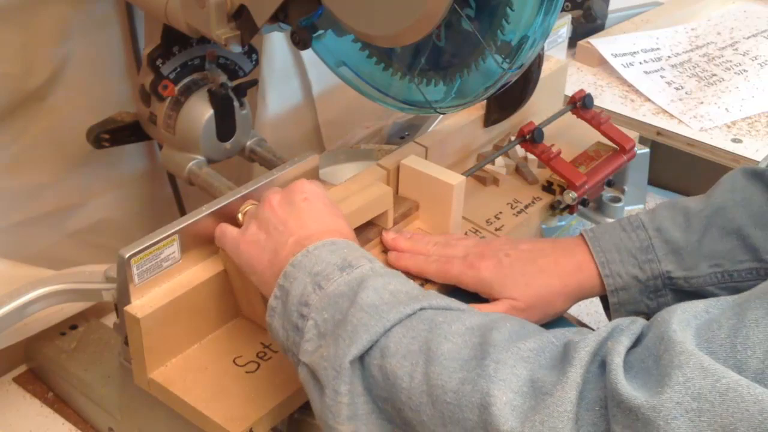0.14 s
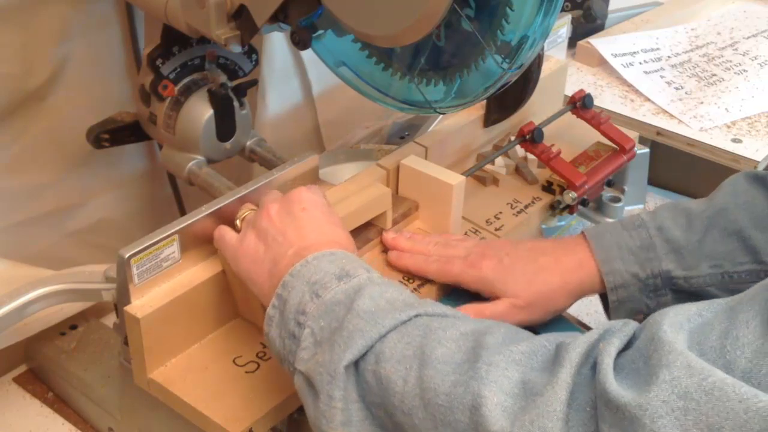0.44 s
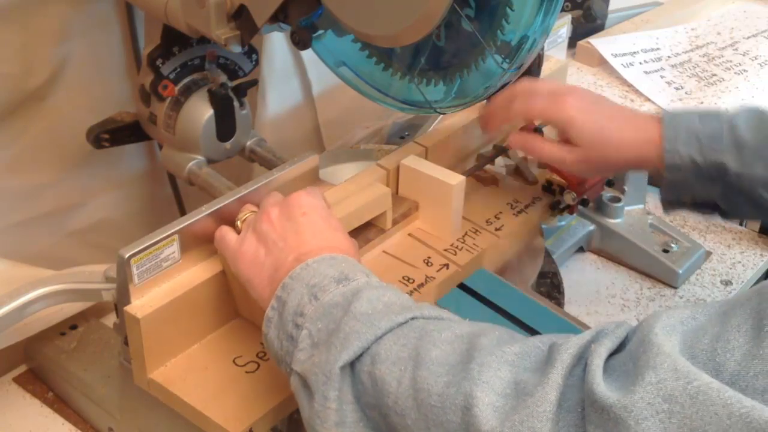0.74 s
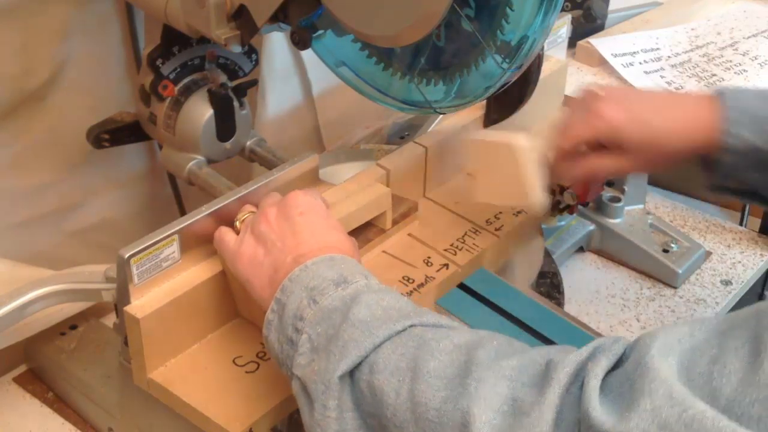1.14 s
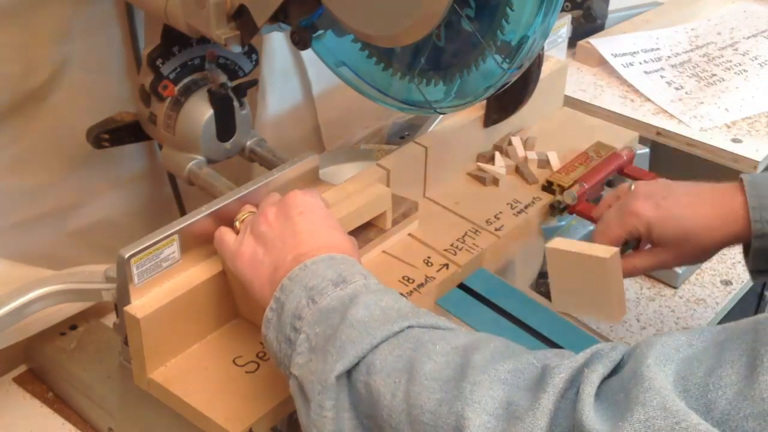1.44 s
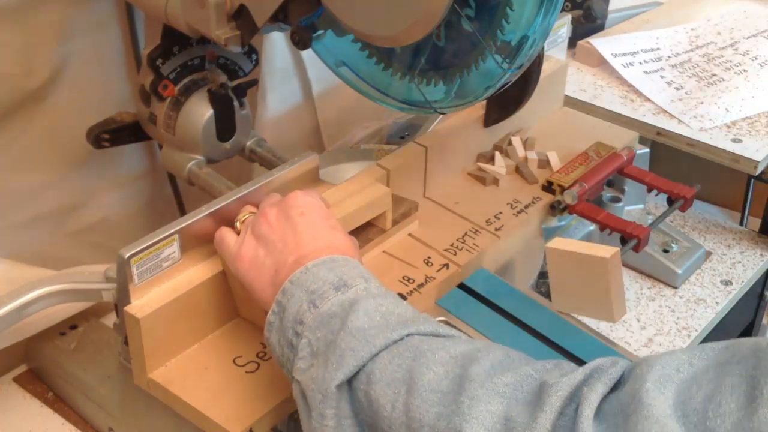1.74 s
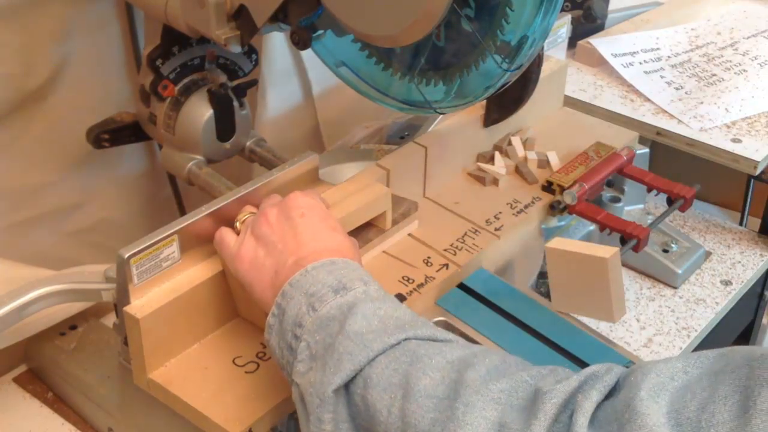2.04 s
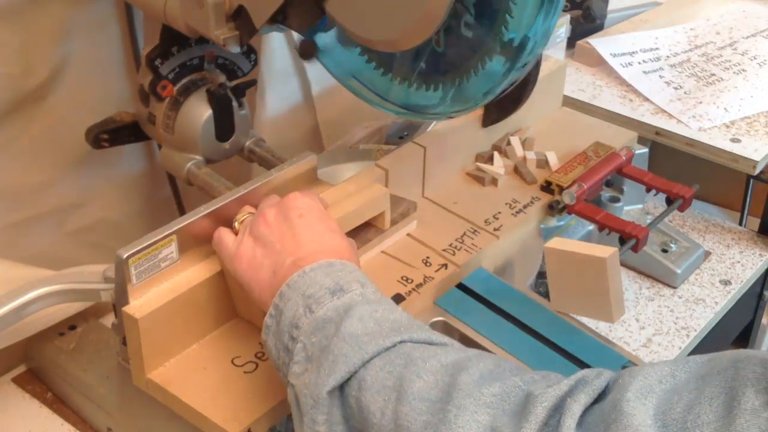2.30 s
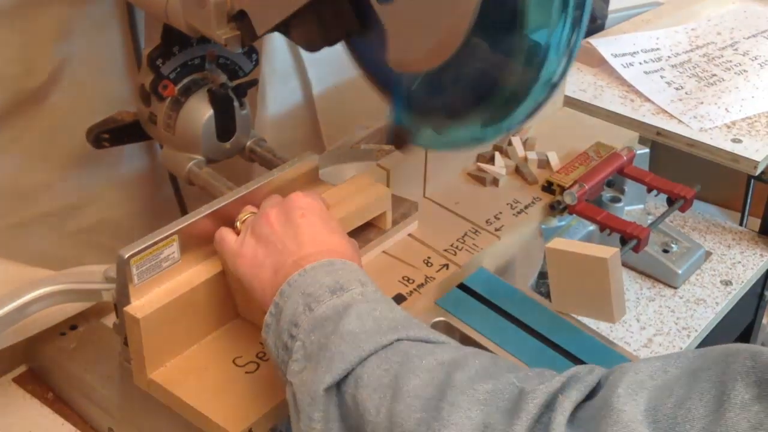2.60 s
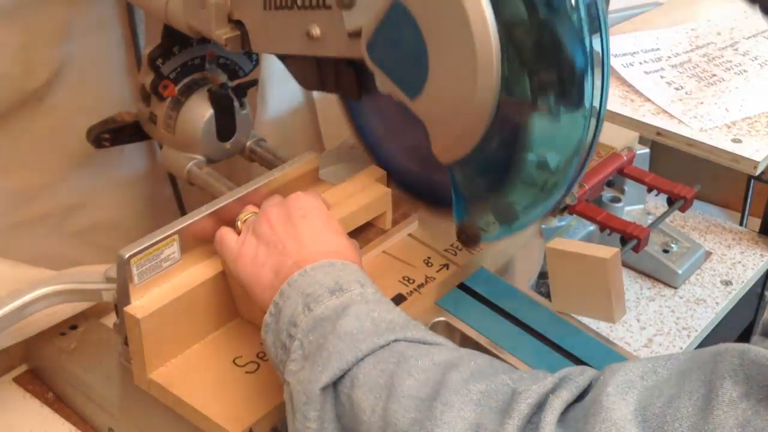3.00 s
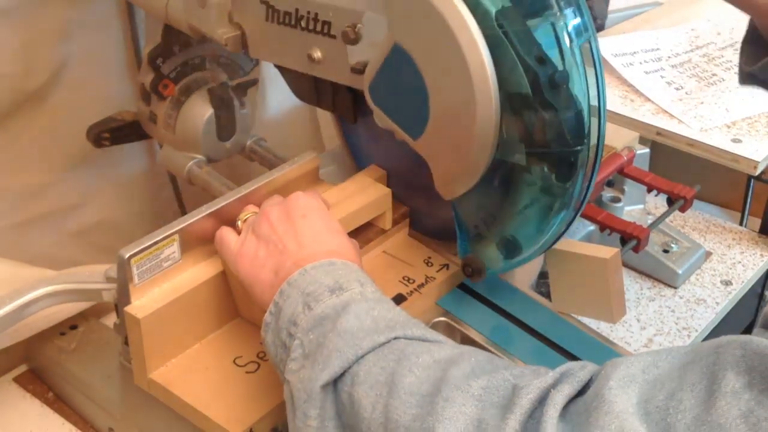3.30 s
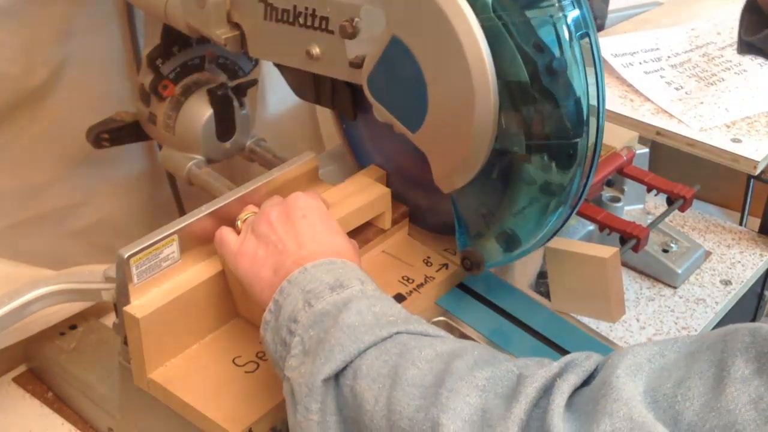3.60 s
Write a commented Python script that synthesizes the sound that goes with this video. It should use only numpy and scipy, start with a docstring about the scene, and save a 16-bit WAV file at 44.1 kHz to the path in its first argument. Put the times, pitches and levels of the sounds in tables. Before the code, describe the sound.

Electric saw heard close in a workshop; first a dying rumble and quiet taps of a wooden block, then a click, soft buzz, rapid spin-up to a harsh roar, and a late sag in pitch.

```python
"""A workshop bench: a fading rumble, small knocks of wood and metal while a stop block is moved, then a trigger click.
A miter saw starts softly with a mains buzz, its rotor whines upward inside a broad roar, and slows as the blade bites.
Knocks and clicks are resonant noise bursts with a room tail, the whines are unsteady sines locked to the rotor speed,
the roar is coloured noise, and the one microphone is overdriven by the saw."""
import sys
import numpy as np
from scipy import signal
from scipy.fft import rfft, irfft, next_fast_len
from scipy.io import wavfile
from scipy.ndimage import uniform_filter1d, map_coordinates

SR = 44100
rng = np.random.default_rng(int(sys.argv[2]) if len(sys.argv) > 2 else 0)


def natural_amplitude(level_db):
    """Convert a level in decibels to a linear amplitude factor, elementwise."""
    exponent = np.asarray(level_db, float) / 20
    return 10 ** exponent


def put_to_file(sound):
    """Save the sound as 16-bit audio at rate SR, in the file named by the first command-line argument."""
    columns = np.atleast_2d(sound).T  # one column per channel
    safe = np.clip(columns, -1, 1)
    whole_steps = np.round(safe * 32767)
    wavfile.write(sys.argv[1], SR, whole_steps.astype(np.int16))


N = 165375  # samples in the scene


def unit(x):
    """Normalisation: scale to rms 1."""
    return x / np.sqrt(np.mean(x ** 2) + 1e-20)


def along(points, hz):
    """Logarithmic pitch scale: (Hz, value) points interpolated along log frequency."""
    f, v = np.transpose(points)
    return np.interp(np.log(hz + 1), np.log(f + 1), v)


def curves(rows, before=None, after=None):
    """Envelopes: one value per sample for each column after the time."""
    s, *columns = np.transpose(rows)
    return [np.interp(np.arange(N) / SR, s, c, before, after) for c in columns]


def wobble(rate):
    """Slow random modulation: a smooth curve through rate random knots a second."""
    knots = rng.standard_normal(int(N * rate / SR) + 4)
    return map_coordinates(knots, [np.arange(N) * rate / SR])


def filtered(x, response):
    """Linear filtering: the spectrum of x times a response of frequency."""
    m = next_fast_len(len(x) + 8192)
    spectrum = rfft(x, m) * response(np.fft.rfftfreq(m, 1 / SR))
    return irfft(spectrum, m)[:len(x)]


def peak(f, hz, width):
    """Damped resonance: the response of one mode, 1 at its centre."""
    return 1j * f * width / (hz * hz - f * f + 1j * f * width + 1e-9)


def rush(spectrum, patchy_db, peaks=()):
    """Turbulent noise: coloured, of rms 1, uneven in time and frequency, with optional resonances."""
    z = signal.stft(rng.standard_normal(N), nperseg=512)[2]
    patches = uniform_filter1d(rng.standard_normal(z.shape), 5, 0)  # smoothed over frequency
    patches = uniform_filter1d(patches, 12, 1)  # and over time
    noise = signal.istft(z * natural_amplitude(patchy_db * unit(patches)), nperseg=512)[1][:N]

    def colour(f):
        lift_db = sum(db * abs(peak(f, hz, width)) ** 2 for hz, width, db in peaks)
        return natural_amplitude(along(spectrum, f)) * natural_amplitude(lift_db)

    return unit(filtered(noise, colour))


def tone(hz, blur, rate=150):
    """Frequency modulation: a sine that follows hz, blurred in phase (radians, rate knots a second)."""
    flutter = natural_amplitude(2.44 * wobble(80))
    phase = 2 * np.pi * np.cumsum(hz) / SR + blur * wobble(rate)
    return np.sqrt(2) * flutter * np.sin(phase)


def swells(rows):
    """Resonance driven by noise: each row is a narrow or broad band that swells for a moment."""
    out = np.zeros(N + SR)
    for start_s, length_s, hz, width, db in rows:
        n = round(length_s * SR)
        noise = rng.standard_normal(SR // 2)
        ring = filtered(noise, lambda f: peak(f, hz, width) ** 2)[4096:][:n]  # skips the build-up
        hump = np.abs(np.sin(np.pi * np.arange(n) / n)) ** 0.25
        out[round(start_s * SR):][:n] += natural_amplitude(db) * unit(hump * ring)
    return out[:N]


# Colour of the still air of the shop before scaling to rms 1: freq_hz, density_db (per Hz)
AIR_COLOUR = [(18, -78), (30, -37), (206, 1.5), (284, -1.5), (1220, -12), (1520, -15.5), (11000, -27.5),
              (14300, -57), (22000, -120)]


def still_air():
    """Stationary noise floor: coloured noise whose level drifts a little."""
    level_db = -64 + 0.6 * wobble(10)
    return natural_amplitude(level_db) * rush(AIR_COLOUR, patchy_db=1.0)


# Levels of the fading sound: time_s, rumble_db (before its lumps), hiss_db
FADING_LEVELS = [(0.01, -50.5, -57.5), (0.084, -55, -62.5), (0.148, -54, -60), (0.696, -64, -70),
                 (0.88, -70, -88), (0.95, -71, -89)]
# Colours of its two noises before scaling to rms 1: freq_hz, density_db (per Hz)
RUMBLE_COLOUR = [(35, -53), (60, -27.5), (238, 2.5), (312, -7.5), (398, -1.5), (515, -12), (729, -5.5),
                 (1300, -22), (1690, -45), (2860, -120)]
HISS_COLOUR = [(650, -15), (1100, 0.5), (3890, -11), (4490, -10.5), (10300, -14), (11000, -15),
               (14300, -49), (22000, -120)]
# Notes that swell within it: start_s, length_s, pitch_hz, width_hz (of each of two passes), level_db
FADING_NOTES = [(.15, 0.078, 404, 74, -55), (.13, 0.093, 4400, 730, -69.5)]


def fading_rumble():
    """Decaying noise: a lumpy rumble and a hiss die away, with two brief resonant notes."""
    rumble_db, hiss_db = curves(FADING_LEVELS)
    lumps_db = 1.3 * wobble(30)
    rumble = natural_amplitude(rumble_db + lumps_db) * rush(RUMBLE_COLOUR, patchy_db=1.7)
    hiss = natural_amplitude(hiss_db) * rush(HISS_COLOUR, patchy_db=1.2)
    return rumble + hiss + swells(FADING_NOTES)


# Decay of the shop's reverberation: freq_hz, t60_s
SHOP_DECAY = [(200, 0.32), (1000, 0.31), (4000, 0.23), (10000, 0.25)]


def shop(x):
    """Reverberation: the sound plus a fresh noise tail in which each frequency dies at its own speed."""
    hz, t, z = signal.stft(rng.standard_normal(SR // 2), SR, nperseg=256)
    decay = natural_amplitude(-60 * t / along(SHOP_DECAY, hz)[:, None])
    tail = signal.istft(z * decay, SR, nperseg=256)[1]
    late = np.pad(x, (150, 0))  # the tail starts 150 samples after the direct sound
    wet = signal.fftconvolve(late, tail / np.linalg.norm(tail))[:len(x)]
    return x + natural_amplitude(-5.5) * wet


def burst(colour, t60):
    """Impact excitation: a coloured noise burst decays exponentially; its length sets its energy."""
    t = np.arange(SR // 2) / SR
    shape = natural_amplitude(-60 * t / t60) * (1 - np.exp(-t / 0.0004))
    noise = filtered(rng.standard_normal(len(t)), colour) * shape
    return unit(noise) * np.sqrt(np.mean(shape ** 2))


# Colour of the bright crack of an impact, before scaling: freq_hz, density_db (per Hz)
CRACK_COLOUR = [(150, -17), (1000, 0), (3000, -12.5), (6000, -11), (11000, -9.5)]


def crack(t60):
    """Contact noise: the short, bright part of an impact."""
    return burst(lambda f: natural_amplitude(along(CRACK_COLOUR, f)), t60)


# Small taps of block, clamp and trigger (level before a common trim, crack relative to the body):
# start_s, level_db, pitch_hz, width_hz (of each of two passes), t60_s, crack_db
TAPS = [(.979, -45.5, 720, 450, 0.1, -22), (1.1315, -46.5, 660, 200, 0.13, -6),
        (1.132, -43, 2260, 2000, 0.073, -4), (1.327, -43, 780, 400, 0.072, -23),
        (1.839, -50, 210, 130, 0.3, -3), (1.84, -41.5, 2970, 2500, 0.029, -0.5),
        (1.9963, -35.5, 3430, 3100, 0.048, -13), (2.193, -43.5, 3450, 3000, 0.028, -4),
        (2.2154, -32.5, 2000, 4000, 0.068, -11), (2.217, -38, 394, 250, 0.14, -23),
        (2.2209, -22, 3730, 2560, 0.027, -4.5), (2.328, -41, 3260, 3003, 0.074, -12),
        (2.419, -34.5, 2500, 5010, .05, -6)]


def taps_and_clicks():
    """Single-mode impacts: each tap is one damped resonance and a crack, with its room tail."""
    out = np.zeros(N + SR)
    for start_s, db, hz, width, t60, crack_db in TAPS:
        body = burst(lambda f: peak(f, hz, width) ** 2, t60)
        tap = body + natural_amplitude(crack_db) * crack(t60=0.047)
        out[round(start_s * SR):][:SR // 2] += natural_amplitude(db - 8.5) * shop(tap)
    return out[:N]


# The block is set down and rocks (level before a common trim, crack relative to the body):
# start_s, level_db, crack_db
BLOCK_KNOCKS = [(1.4225, -27.5, -1.5), (1.4329, -26.5, -10.5), (1.448, -36.5, -24)]
# Modes of the wooden block: pitch_hz, width_hz (before the response is cubed), level_db (relative)
BLOCK_MODES = [(424, 91, 8), (708, 120, 7), (1060, 480, -4), (1600, 290, -10), (2410, 280, -10.5)]


def block_knocks():
    """Modal impact: noise through the block's wood modes, dying together, plus a crack and room tail."""
    def wood(f):
        return sum(natural_amplitude(db) * abs(peak(f, hz, width)) ** 3 for hz, width, db in BLOCK_MODES)

    out = np.zeros(N + SR)
    for start_s, db, crack_db in BLOCK_KNOCKS:
        knock = burst(wood, t60=0.096) + natural_amplitude(crack_db) * crack(t60=0.065)
        out[round(start_s * SR):][:SR // 2] += natural_amplitude(db - 6) * shop(knock)
    return out[:N]


# Brief resonant swells of the saw: narrow buzz notes at 483, 662, 665 and 725 Hz,
# and ringing of blade and guard:
# start_s, length_s, pitch_hz, width_hz (of each of two passes), level_db
SAW_SWELLS = [(2.262, 0.04, 665, 35, -45.5), (2.468, 0.1, 8350, 200, -48.5),
              (2.55, 0.39, 8420, 1000, -31.5), (2.8, 0.11, 3168, 40, -27.5),
              (2.885, 0.18, 1360, 140, -29.5), (2.49, .08, 483, 110, -37.5), (2.945, .06, 2375, 90, -29.5),
              (3.2, 0.14, 3425, 80, -27.5), (3.29, 0.27, 1300, 146, -29.5), (3.45, .11, 4560, 320, -28.5),
              (3.05, 0.21, 8900, 3600, -26), (3.68, .1, 910, 110, -35), (2.65, .065, 868, 24, -33.5),
              (2.44, 0.11, 662, 30, -38.5), (2.53, 0.077, 725, 35, -37), (2.72, 0.064, 1120, 30, -35)]


def buzz_notes_and_ringing():
    """Resonance: brief swells of noise-fed bands give buzz notes and the ringing of blade and guard."""
    return swells(SAW_SWELLS)


# Level of the chopped current's buzz: time_s, level_db
BUZZ_LEVEL = [(2.28, -73), (2.41, -46.5), (2.55, -42), (2.7, -44.5), (2.74, -54)]
# Its harmonics: multiple of the mains frequency, level_db (relative)
BUZZ_HARMONICS = [(4, 3.5), (6, 5.5), (7, 2.5), (8, -11), (9, -6.5), (11, -8), (12, -1), (14, -11),
                  (16, -8.5)]


def soft_start_buzz():
    """Harmonic series: chopped mains current buzzes at multiples of the mains frequency."""
    mains_hz = 60.2
    level_db, = curves(BUZZ_LEVEL, before=-120, after=-120)
    buzz = np.zeros(N)
    for multiple, db in BUZZ_HARMONICS:
        buzz += natural_amplitude(db) * tone(np.full(N, multiple * mains_hz), blur=0.58, rate=45)
    return natural_amplitude(level_db) * buzz


# Levels of three bands of roar: time_s, low_db, middle_db, treble_db
ROAR_LEVELS = [(2.24, -49.5, -65, -75), (2.32, -47.5, -59, -69), (2.4, -44.5, -58, -63),
               (2.43, -39.5, -44.5, -59), (2.47, -41.5, -35, -52.5), (2.52, -37.5, -28, -33.5),
               (2.6, -32.5, -26, -23), (2.75, -36.5, -24.5, -22), (2.87, -32.5, -22, -23.5),
               (3.1, -34, -22.5, -22), (3.3, -31, -22.5, -22.5), (3.5, -28, -21, -22.5),
               (3.6, -34.5, -22, -23), (3.75, -32, -26, -21.5)]
# Colours of the bands before housing and scaling to rms 1: freq_hz, density_db (per Hz)
LOW_COLOUR = [(30, -35), (170, -26), (300, -6), (400, -3), (700, -0.5), (1000, -4), (2000, -13),
              (5000, -55), (12000, -49)]
MIDDLE_COLOUR = [(300, -30.5), (700, -10.5), (1200, -3.5), (1800, -2.5), (2800, -2), (4000, -5.5),
                 (7000, -20.5), (12000, -36)]
TREBLE_COLOUR = [(1500, -23.5), (3000, -10), (4600, 1), (6000, -0.5), (9000, 0), (10400, -4), (12000, -5.5)]
# Resonances of the housing: pitch_hz, width_hz, lift_db (over the roar's colour)
HOUSING_MODES = [(230, 19, 7.5), (390, 79, 4), (695, 90, 4.5), (859, 37, 6.5), (1306, 61, 7.5),
                 (3020, 130, 2.5)]


def air_and_brush_roar():
    """Broadband flow and friction noise: air and brushes roar; the housing colours low and middle."""
    low_db, middle_db, treble_db = curves(ROAR_LEVELS, before=-120)
    low = natural_amplitude(low_db) * rush(LOW_COLOUR, patchy_db=1.9, peaks=HOUSING_MODES)
    middle = natural_amplitude(middle_db) * rush(MIDDLE_COLOUR, patchy_db=1.88, peaks=HOUSING_MODES)
    treble = natural_amplitude(treble_db) * rush(TREBLE_COLOUR, patchy_db=2.5)
    return low + middle + treble


# Speed of the rotor: time_s, turns_per_s
ROTOR_SPEED = [(2.45, 95), (2.64, 162), (2.7, 188), (2.8, 237), (2.87, 260), (2.93, 274), (3.05, 302),
               (3.14, 316), (3.26, 317), (3.52, 317.5), (3.575, 324), (3.615, 316), (3.69, 262),
               (3.75, 233)]
# Levels of the whines before their flutter: time_s, gear_db, slot_db, high_db
WHINE_LEVELS = [(2.45, -67, -72, -65), (2.66, -52, -36, -62), (2.7, -53, -28.5, -60),
                (2.75, -48, -29.5, -60), (2.8, -40, -27, -56.5), (2.87, -48, -22, -63),
                (2.93, -48, -28.5, -60), (2.96, -34, -43, -60), (3.05, -29, -39, -60),
                (3.17, -33, -34, -52), (3.26, -45, -31, -60), (3.32, -29, -48, -52),
                (3.52, -32.5, -44, -54), (3.58, -19, -59, -38), (3.615, -23.5, -42, -25),
                (3.65, -42, -35, -46), (3.69, -36, -31, -30), (3.712, -34, -35, -34), (3.75, -38, -37, -25)]
# Brief high whines at 56 and 42 cycles per turn glint while the rotor speeds up:
# start_s, length_s, cycles per turn, level_db (at the top of the hump, before flutter)
WHINE_GLINTS = [(2.58, .065, 56, -37), (2.68, 0.087, 42, -28)]


def rotor_whine():
    """Order tones: gear, slots and unbalance sound at fixed multiples of the rotor's turning rate."""
    turns, = curves(ROTOR_SPEED)
    gear_db, slot_db, high_db = curves(WHINE_LEVELS, before=-120)
    t = np.arange(N) / SR
    # whine cycles per rotor turn: gear 9, slots 12, high 28
    whine = natural_amplitude(gear_db) * tone(9 * turns, blur=1.23, rate=190)
    whine += natural_amplitude(slot_db) * tone(12 * turns, blur=0.75, rate=210)
    whine += natural_amplitude(high_db) * tone(28 * turns, blur=1.3)
    # the once-per-turn tone of unbalance, near full speed, with 73 ms ramps
    ramps = np.clip(np.minimum(t - 2.95, 3.66 - t) / 0.073, 0, 1)
    whine += natural_amplitude(-42) * ramps * tone(turns, blur=0.38, rate=30)
    for start_s, length_s, cycles, db in WHINE_GLINTS:
        hump = np.sin(np.pi * np.clip((t - start_s) / length_s, 0, 1)) ** 0.5
        whine += natural_amplitude(db) * hump * tone(cycles * turns, blur=1.1, rate=300)
    return whine


def scene():
    """Superposition: all sources add at one microphone, sent alike to two channels."""
    background = still_air() + fading_rumble()
    bench = taps_and_clicks() + block_knocks()
    saw = buzz_notes_and_ringing() + soft_start_buzz() + air_and_brush_roar() + rotor_whine()
    return np.tile(background + bench + saw, (2, 1))


def roll_off(x):
    """The treble ends steeply here."""
    return signal.sosfilt(signal.butter(12, 11900, fs=SR, output="sos"), x)


def record(dry):
    """Saturation and band limiting: the input stage overdrives, then bass and top are cut."""
    ceiling, hardness = 0.12, 3.3  # ceiling in full scale; a harder knee bends later
    bass_cut_hz, top_hz, edge_hz = 45, 10900, 190
    lag_rad = 1.8  # phase lag of the top filter at top_hz
    x = dry[0] / (1 + np.abs(dry[0] / ceiling) ** hardness) ** (1 / hardness)

    def response(f):
        top_cut = np.clip((top_hz - f) / edge_hz + 0.5, 0, 1) ** 2
        lag = np.exp(-1j * lag_rad * (f / top_hz) ** 4)
        bass_cut = 1j * f / (bass_cut_hz + 1j * f)
        return top_cut * lag * bass_cut

    mix = np.tile(filtered(x, response), (2, 1))
    return roll_off(mix)


dry = scene()
out = record(dry)
put_to_file(out)
```